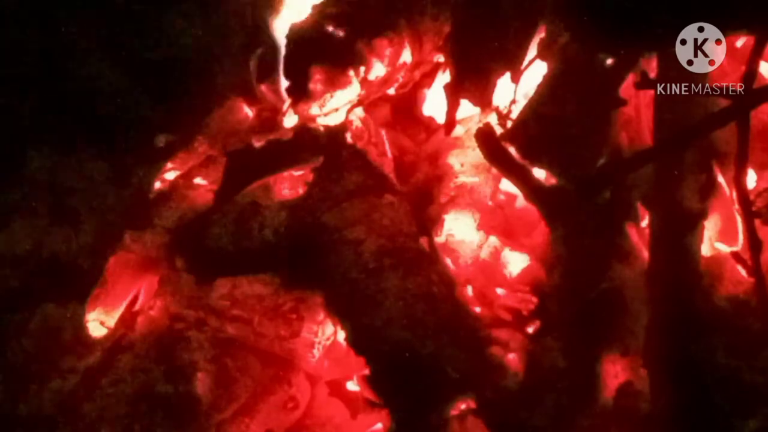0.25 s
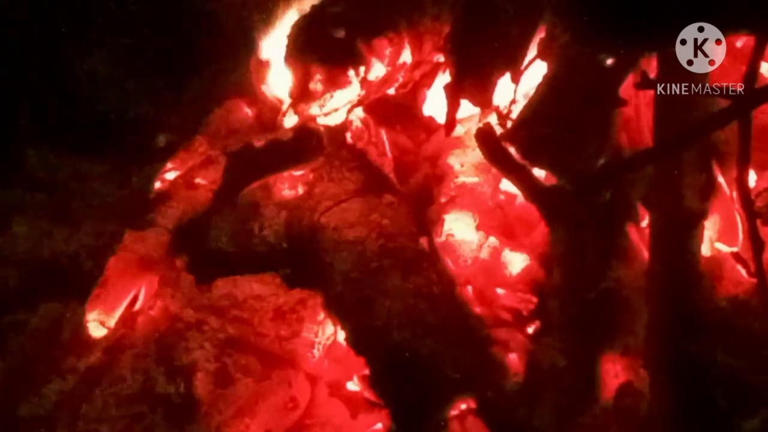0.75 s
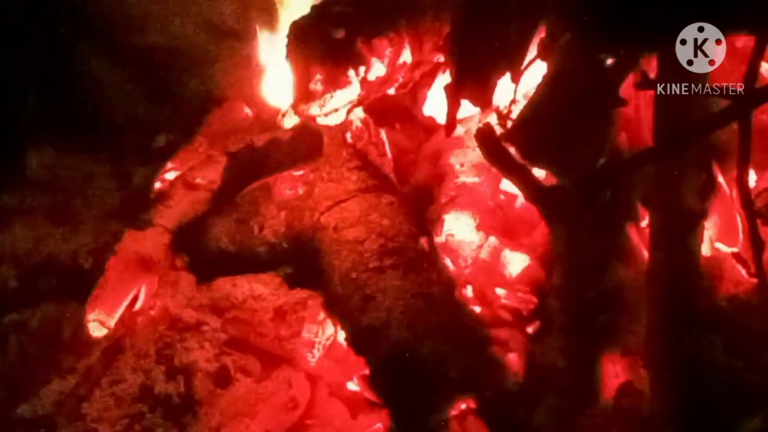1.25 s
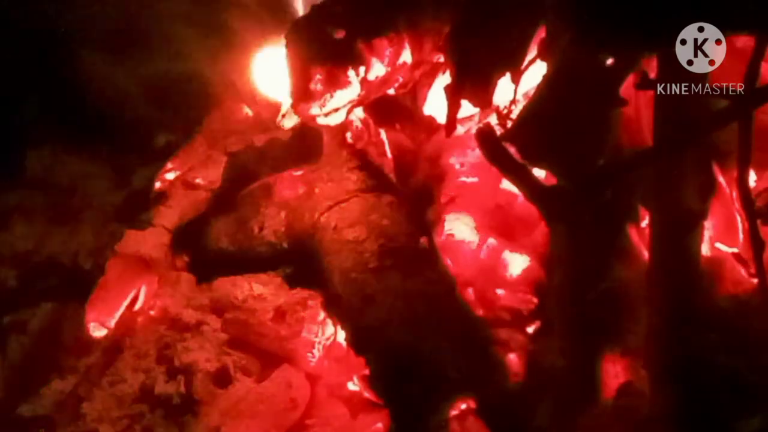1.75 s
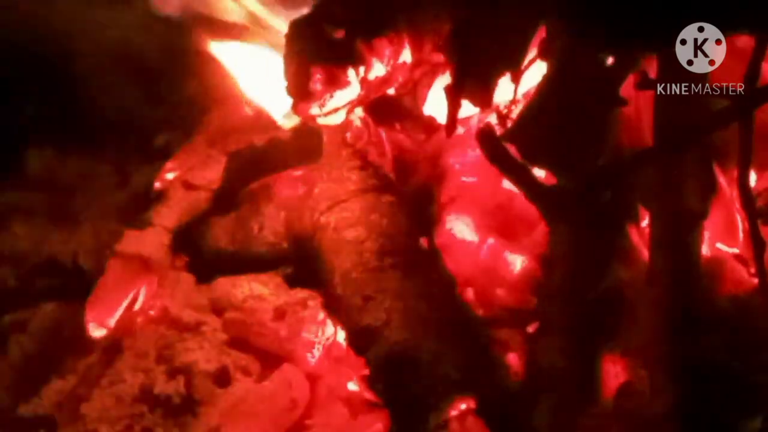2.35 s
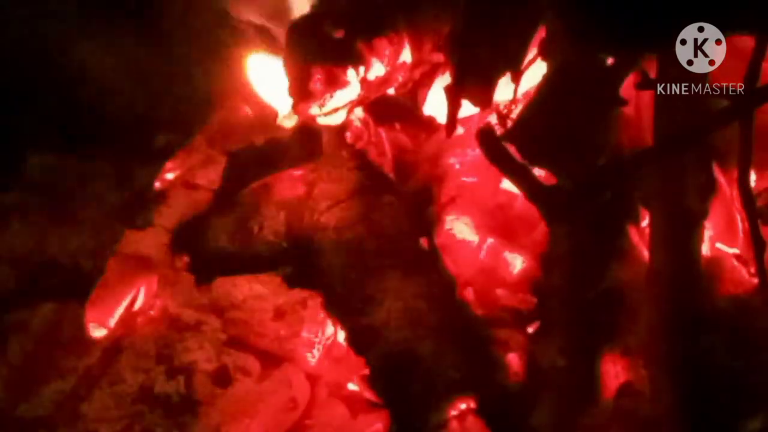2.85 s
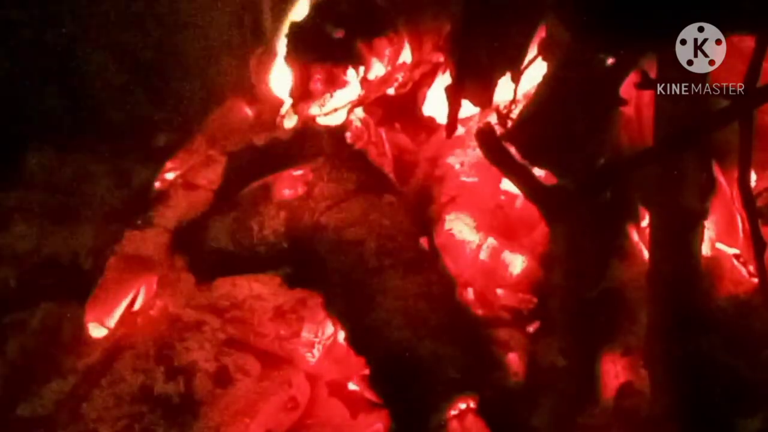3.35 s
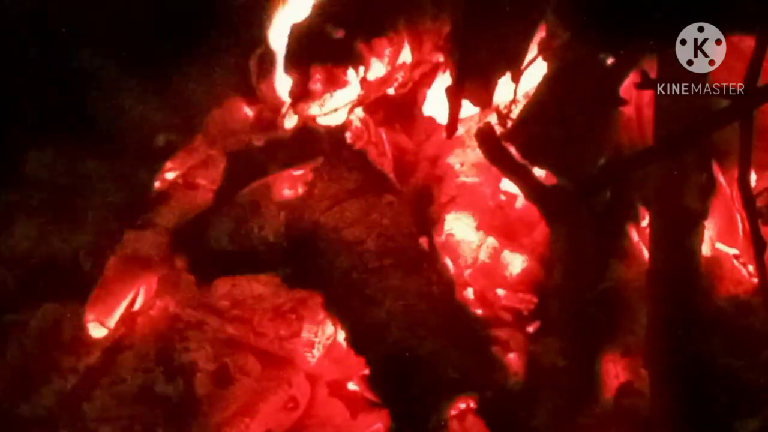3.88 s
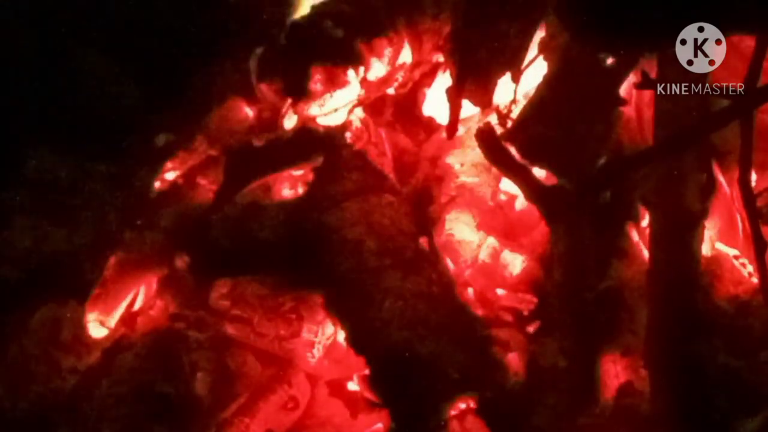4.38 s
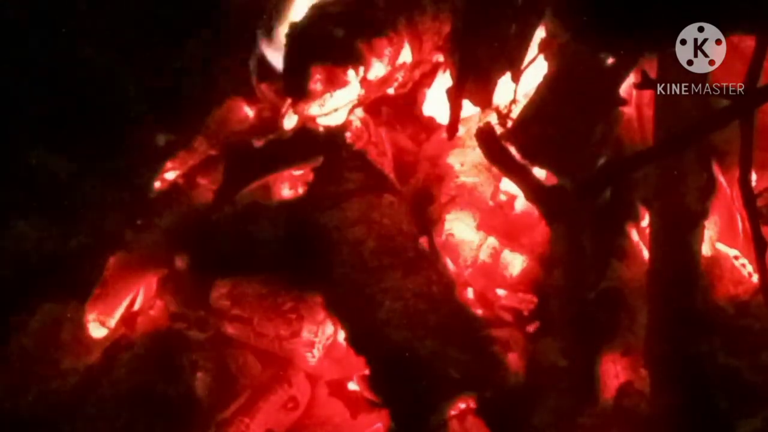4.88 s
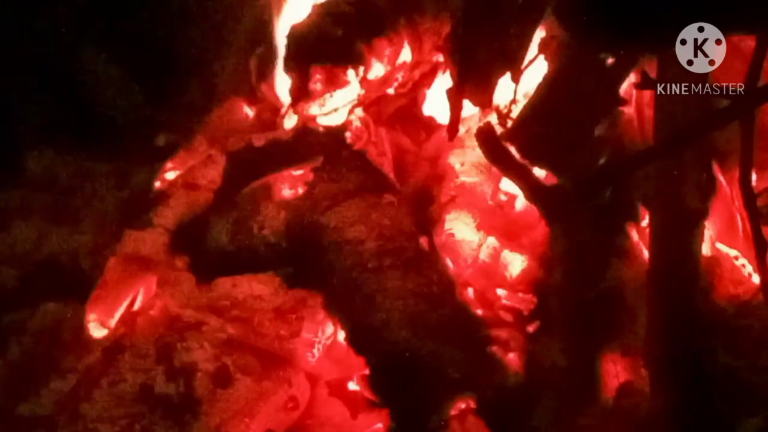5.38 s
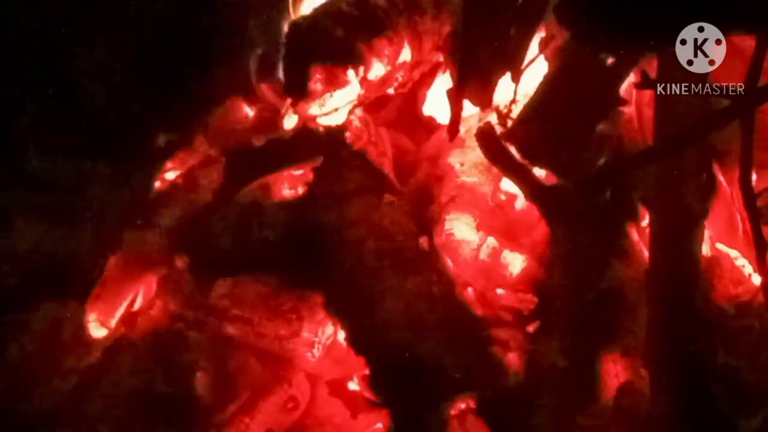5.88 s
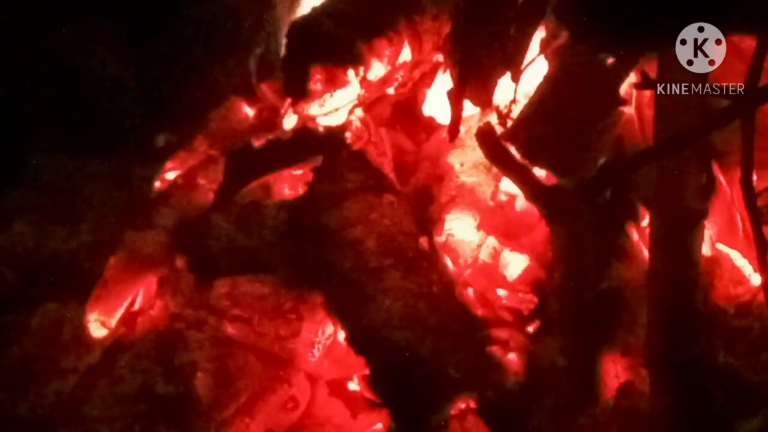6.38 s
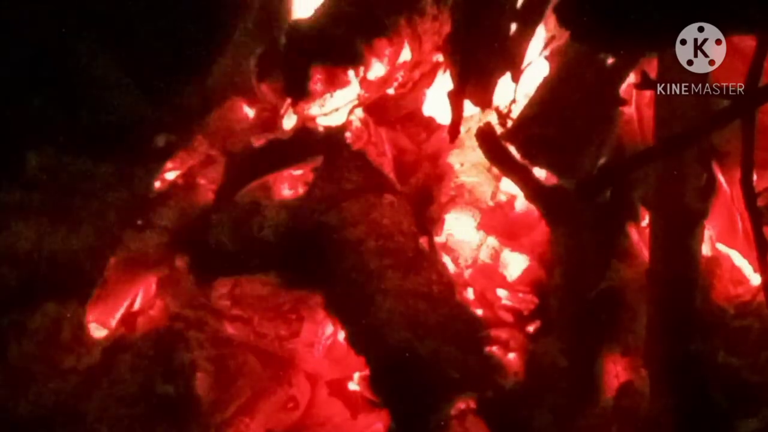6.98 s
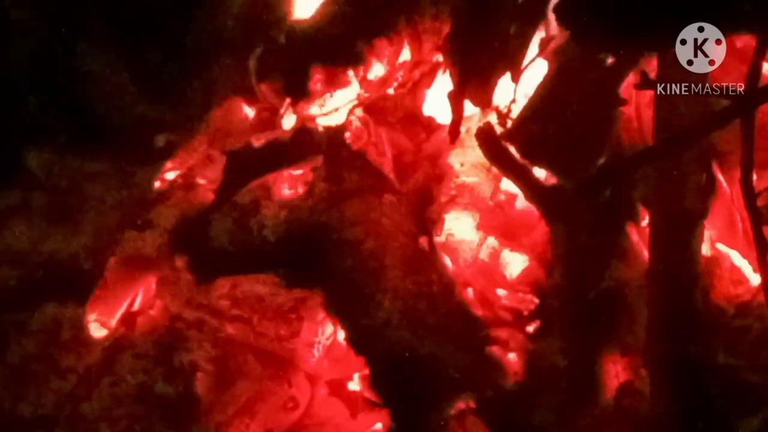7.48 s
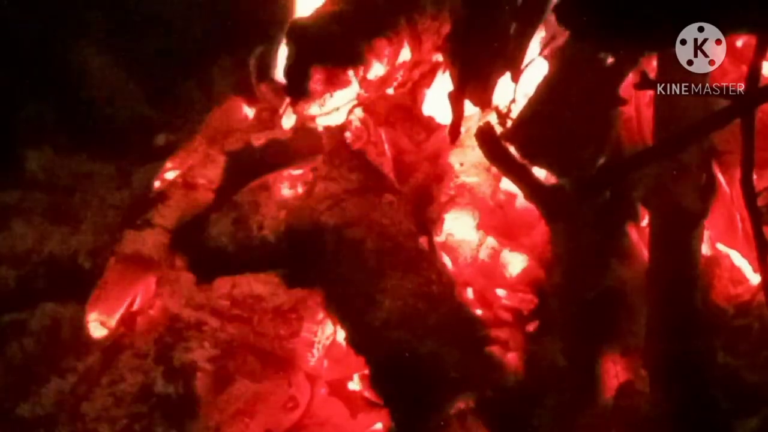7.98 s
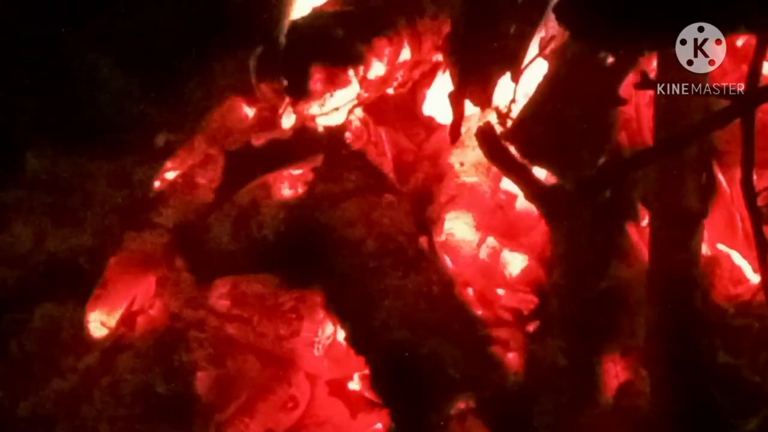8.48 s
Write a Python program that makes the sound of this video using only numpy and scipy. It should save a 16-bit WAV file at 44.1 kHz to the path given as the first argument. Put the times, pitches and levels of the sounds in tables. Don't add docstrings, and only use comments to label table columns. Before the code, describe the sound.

Night insects chirp steadily from surrounding trees, a high thin trill throbbing about three times a second. Beside the microphone, burnt wood crackles irregularly: light ticks and snaps at first, a strong burst past the middle, then one sharp heavy pop and smaller cracks after. Wet wood seeps faint steam, and the low flame flutters quietly in an open outdoor setting.

```python
import sys
import numpy as np
from scipy import signal
from scipy.fft import rfft, irfft, next_fast_len
from scipy.io import wavfile
from scipy.ndimage import uniform_filter1d

SR = 44100
rng = np.random.default_rng(int(sys.argv[2]) if len(sys.argv) > 2 else 0)


def unload_audio(sound):
    columns = np.transpose(np.atleast_2d(sound))
    steps = np.round(np.clip(columns, -1, 1) * 32767)
    wavfile.write(sys.argv[1], SR, steps.astype(np.int16))


N = 385434
TIME = np.arange(N) / SR
LEAD_IN = 64


def undb(db):
    return np.exp(np.asarray(db) * (np.log(10) / 20))


def unit(x):
    return x / np.sqrt(np.mean(x ** 2))


def peak(x, db):
    return x * undb(db) / np.max(np.abs(x))


def ring(x, hz, width_hz):
    return signal.lfilter(*signal.iirpeak(min(hz, .45 * SR), hz / width_hz, fs=SR), x, axis=-1)


def band(x, hz, kind, order=4):
    return signal.sosfilt(signal.butter(order, hz, kind, fs=SR, output="sos"), x)


def walk(rate):
    levels = rng.standard_normal(int(N / SR * rate) + 2)
    t = TIME[::16]
    joined = np.interp(t * rate, np.arange(len(levels)), levels)
    smooth = uniform_filter1d(joined, int(SR / rate / 32))
    return np.interp(TIME, t, 1.2 * smooth)


def hiss(colour, flicker_db, flicker_rate, per_octave=2):
    hz, db = np.transpose(colour)
    size = next_fast_len(N)
    octave = np.log2(np.maximum(np.fft.rfftfreq(size, 1 / SR), 1))
    spectrum = rfft(rng.standard_normal(size)) * undb(np.interp(octave, np.log2(hz), db))
    out = 0
    for centre in np.arange(np.log2(hz[1]), np.log2(hz[-1]), 1 / per_octave):
        share = np.clip(1 - np.abs(octave - centre) * per_octave, 0, 1)
        out = out + irfft(spectrum * share, size)[:N] * undb(flicker_db * walk(flicker_rate))
    return unit(out)


def swells(table):
    t = TIME[::64]
    power = sum(undb(2 * db) * np.exp(-(3.25 * (t - s) / length) ** 2) for s, db, length in table)
    return np.interp(TIME, t, power)


def add(track, s, sound):
    i = int(s * SR)
    track[i:i + len(sound)] += sound[:len(track) - i]


def chirps():
    # (time [s], level [dB], lead over the beat [chirps])
    near = [(0, -50, 0.077), (1.0, -48.5, -.04), (1.55, -52, -.12), (1.9, -52.5, 0.14), (2.4, -50, 0.17),
            (3.4, -55, -0.094), (4.3, -50.5, 0.0088), (4.7, -51.5, -0.12), (5.5, -56.5, 0.17),
            (6.1, -50.5, -0.026), (6.7, -59, 0.09), (7.2, -62, -0.13), (7.9, -53, 0.041),
            (8.74, -55, -0.037)]
    s, near_db, lead = np.transpose(near)
    per_s, slowing_per_s2, start, share = 3.6, .065, .37, .5
    far_chorus_db = -50.5
    beat = (per_s - slowing_per_s2 * TIME / 2) * TIME + start + share / 2
    beat = beat + np.interp(TIME, s, lead)
    level = (beat % 1 < share) * undb(np.interp(TIME, s, near_db))
    syllables = np.sin(2 * np.pi * np.cumsum(28 * (1 + 0.116 * walk(8))) / SR)
    return uniform_filter1d(level, size=2400) * undb(5 * syllables) + undb(far_chorus_db)


def insects():
    # (wing resonance [Hz], strokes [per s], level [dB])
    singers = [(6330, 118, -24), (6440, 127, -7), (6560, 131, 1.5), (6680, 139, 0.5), (6815, 128, -3.5),
               (7000, 147, -13.5)]
    level = chirps()
    out, crowd = 0, 0
    for hz, rate, db in singers:
        phase = np.cumsum(rate * (1 + 0.1 * walk(50))) / SR
        strokes = np.diff(np.floor(phase), prepend=0) * undb(3.54 * walk(70))
        phrase = undb(db + 1.5 * walk(12))
        crowd = crowd + phrase ** 2
        wing = ring(ring(ring(strokes, hz, 120), hz, 190), hz, 280)
        out = out + phrase * unit(wing)
    out = out / np.sqrt(crowd) * level
    t = TIME[:SR // 4]
    trees = unit(rng.standard_normal(len(t)) * undb(-60 * t / .18)) / np.sqrt(len(t))
    return undb(-7.5) * (out + undb(-3.5) * signal.oaconvolve(out, trees)[:N])


def flame():
    # (frequency [Hz], level per Hz [dB])
    flame_colour = [(15, -66), (28, -30), (45, -11.5), (70, 1.5), (120, -1.5), (190, -11), (270, -18.5),
                    (400, -36), (700, -44.5)]
    # (middle [s], level [dB], length [s])
    puff_times = [(0, -60, 0.046), (0.22, -62, .22), (0.42, -56.5, 0.1), (0.78, -62, 0.12),
                  (1.22, -57.5, 0.073), (1.42, -61, 0.064), (2.12, -61.5, 0.089), (2.33, -57, 0.089),
                  (2.6, -67, .1), (3.14, -60.5, 0.09), (3.48, -62, 0.11), (3.72, -63, 0.13),
                  (4.3, -61.5, 0.099), (4.48, -58.5, 0.15), (4.8, -68, 0.31), (4.95, -65, 0.13),
                  (5.1, -61, 0.13), (5.55, -59.5, 0.28), (5.9, -56, 0.3), (6.28, -55, 0.078),
                  (6.43, -60.5, 0.087), (6.9, -70, 0.48), (7.35, -61, .12), (7.56, -58, 0.24),
                  (7.85, -68, 0.089), (8.35, -62, 0.074), (8.7, -74, .1)]
    calm_db = -73.5
    burn = hiss(flame_colour, 1.9, 8)
    flutter = unit(band(burn, 206.0, "low")) * undb(-51.0 + 0.47 * walk(2.605))
    draught = np.sqrt(swells(puff_times) + undb(2 * calm_db))
    puffs = unit(band(burn, 214, "high")) * draught * undb(1.8 * walk(12))
    return flutter + puffs


def woods_hush():
    # (frequency [Hz], level per Hz [dB])
    hush_colour = [(180, -38), (300, -1), (440, -9.5), (790, -10), (1800, -19), (3000, -28), (5000, -25.5),
                   (7000, -42)]
    return undb(-72.5 + 1.1 * walk(11)) * hiss(hush_colour, 3, 18, per_octave=4.98)


def steam_level():
    # (time [s], level [dB])
    seep = [(0, -62), (0.8, -64), (1.25, -55.5), (1.5, -64), (2.4, -62), (2.97, -69.5), (3.03, -58.5),
            (3.4, -59.5), (3.82, -62), (4.3, -60), (4.85, -65), (5.5, -61), (5.8, -57.5), (6.2, -62),
            (6.55, -62.5), (7.3, -62.5), (7.8, -64), (8.74, -65)]
    # (middle [s], level [dB], length [s])
    spurts = [(0.06, -60, .14), (0.56, -57.5, 0.092), (0.93, -52.5, 0.1), (1.1, -71, 0.2),
              (1.33, -70, 0.13), (2.06, -61.5, 0.2), (2.28, -57.5, 0.099), (3.15, -64, 0.18),
              (3.3, -55.5, 0.18), (3.6, -63, 0.3), (3.91, -56.5, 0.047), (4.25, -57, 0.38),
              (4.52, -57, 0.077), (4.74, -58.5, 0.22), (4.96, -72, 0.17), (5.06, -57, 0.15),
              (5.22, -48.5, 0.18), (5.65, -63, 0.16), (5.9, -56.5, .12), (6.1, -56, 0.11),
              (6.27, -51, 0.084), (6.75, -55, 0.16), (7, -68, 0.23), (7.51, -58, 0.26),
              (7.84, -63.5, 0.067), (8.08, -55, 0.15), (8.67, -61.5, 0.13)]
    return np.sqrt(undb(2 * np.interp(TIME, *np.transpose(seep))) + swells(spurts))


def bubbles():
    # (ring [Hz], width [Hz], ticks [per s], level re steam [dB])
    bubble_kinds = [(2630, 340, 20, 14), (4490, 640, 40, 18.5), (9000, 3300, 37, 21), (13000, 4600, 35, 17)]
    out = 0
    for hz, width_hz, rate, db in bubble_kinds:
        chance, ticks = rng.random((int(rate * N / SR), 2)), np.zeros(N)
        extra_db = 5.5 * np.minimum(-np.log(1 - chance[:, 1]), 2.2)
        ticks[(chance[:, 0] * N).astype(int)] = undb(db + extra_db)
        out = out + ring(ring(ticks, hz, width_hz), hz, 1.3 * width_hz)
    return out


def burst(chance, rise_s, fall_s):
    t = (np.arange(chance.shape[-1]) - LEAD_IN) / SR
    return chance * np.exp(np.where(t < 0, t / rise_s, -t / fall_s)) + 1.36 * (t == 0)


def pops(table, shape):
    snaps, jets = np.zeros(N), np.zeros(N)
    t = TIME[:int(.4 * SR)]
    for (s, db, hz, gas_db, t60), chance in zip(table, rng.standard_normal((len(table), 384))):
        add(snaps, s - LEAD_IN / SR, peak(shape(chance, hz, db), db))
        fade = undb(-120 * t / max(t60, .01)) + 0.095 * undb(-45 * t / max(t60, .01))
        add(jets, s, undb(2 * (db + gas_db)) * fade * (1 - np.exp(-t / 0.00046)))
    return snaps, jets


def crack(chance, hz, db):
    tear = burst(chance, .0001, 0.00012 * undb(0.93 * (db + 30)))
    return band(ring(tear + 3.0 * ring(tear, hz, 1200), 10000, 7900), 5980, "high", order=8)


def dry_snaps():
    # (time [s], peak [dB], ring [Hz])
    snap_times = [(0.184, -29, 13800), (0.8259, -33, 10500), (0.9468, -34.5, 10200), (1.1073, -36, 8700),
                  (1.8395, -39, 12600), (2.0076, -33, 11300), (2.3256, -36, 10300), (2.464, -31, 10900),
                  (3.0224, -34, 9200), (3.2434, -29, 9100), (3.477, -29, 14200), (3.479, -26.5, 11600),
                  (3.5083, -31.5, 13100), (4.1145, -23, 13800), (4.1422, -38, 11700), (4.9948, -30.5, 9000),
                  (5.1242, -15, 12100), (5.357, -22.5, 13000), (5.8786, -32, 8900), (6.052, -35, 11300),
                  (6.0965, -32, 8900), (6.266, -27, 11700), (6.5327, -36, 10900), (6.5761, -12, 8900),
                  (6.922, -32, 10600), (1.695, -37, 9000), (7.4806, -23.5, 13800), (7.977, -31, 8800),
                  (8.0259, -33.5, 9400), (8.36, -33.5, 9900)]
    gas_db, gas_t60_s = -24, 0.067
    return pops([(*row, gas_db, gas_t60_s) for row in snap_times], crack)


def knock(chance, hz, db):
    return ring(ring(burst(chance, 0.00031, 0.00054), hz, 0.35 * hz), hz, 0.47 * hz)


def charcoal_knocks():
    # (time [s], peak [dB], ring [Hz], vented gas re peak [dB])
    knock_times = [(1.6493, -35, 4800, -24), (2.3247, -46, 4800, -12.5), (2.522, -38, 4970, -18),
                   (3.009, -46, 5300, -9.5), (3.0766, -48, 4200, -12), (3.2753, -40, 5100, -13.5),
                   (3.3215, -41.5, 3700, -19), (3.4792, -35.5, 4670, -25), (3.9737, -50.5, 3100, -7),
                   (4.064, -33.5, 5270, -21), (4.863, -29, 5900, -26.5), (4.9945, -32.5, 4460, -27),
                   (5.077, -19, 4900, -24.5), (3.3972, -46.5, 4900, -20), (5.118, -14, 5500, -23.5),
                   (5.1773, -25.5, 4660, -17.5), (5.1839, -33, 4560, -31), (5.5443, -31.5, 5100, -21.5),
                   (5.8378, -40, 4930, -11), (5.992, -50.5, 5500, -4), (6.2888, -39, 2780, -17),
                   (6.3103, -43.5, 2860, -12.5), (6.4207, -39.5, 5100, -15.5), (6.5692, -19.5, 2780, -13),
                   (6.693, -41, 4970, -15), (6.872, -46, 4260, -12.5), (7.2742, -37.5, 5120, -26),
                   (7.3724, -38, 5270, -13), (7.4631, -36.5, 5540, -23), (7.4815, -32, 5730, -20)]
    # (time [s], peak [dB], ring [Hz], width [Hz])
    hollows = [(1.6502, -44, 3600, 1200), (4.21, -57, 2200, 300), (5.0768, -27, 2900, 1800),
               (5.119, -28, 2000, 1600), (5.76, -60, 2000, 250), (6.011, -47, 2480, 500),
               (6.2654, -45, 2700, 900), (6.1, -52, 3500, 500), (6.4225, -48, 2640, 500),
               (6.5689, -20, 5700, 900), (6.5691, -25, 2200, 1300), (6.5695, -35, 1350, 300),
               (7.374, -49, 1810, 250)]
    knocks, jets = pops([(*row, .13) for row in knock_times], knock)
    chances = rng.standard_normal((len(hollows), 1024))
    for (s, db, hz, width_hz), chance in zip(hollows, chances):
        hollow = ring(ring(burst(chance, .0002, .0006), hz, width_hz), hz, 1.6 * width_hz)
        add(knocks, s - LEAD_IN / SR, peak(hollow, db))
    return band(knocks, 1370, "high"), jets


def gas_cracks():
    # (time [s], peak [dB], ring [Hz], vented gas re peak [dB], gas t60 [s])
    crack_times = [(1.6498, -32.5, 8700, -25, .12), (1.7101, -25, 9500, -23, .048),
                   (2.2697, -38, 9900, -19, 0.53), (2.5228, -33, 9100, -20.5, .31),
                   (2.817, -29.5, 9300, -27, .092), (3.0091, -36, 9200, -10.5, 0.086),
                   (3.0762, -29.5, 9700, -21, 0.14), (3.275, -31, 8400, -13, 0.11),
                   (3.3207, -26.5, 9200, -25, .09), (4.0642, -27, 8500, -20, 0.16),
                   (4.6018, -34, 13000, -18, 0.21), (4.863, -18, 11600, -15.5, 0.24),
                   (5.0764, -16.5, 11300, -17, 0.13), (5.1176, -18, 11000, -12, 0.27),
                   (5.1832, -19, 12500, -20, .13), (5.5444, -22.5, 13500, -20, .09),
                   (5.8392, -32, 11300, -18, 0.11), (5.9931, -25, 11200, -13.5, 0.077),
                   (6.4221, -29.5, 11000, -18, 0.16), (6.569, -9.5, 9800, -20, 0.37),
                   (7.2725, -27.5, 12400, -21, 0.21), (7.3732, -24.5, 8400, -17.5, 0.16),
                   (7.4634, -33.5, 12800, -10, 0.28), (7.6464, -28.5, 9300, -17.5, .18)]
    echo_s, echo_db = 0.01, -10.5
    cracks, jets = pops(crack_times, crack)
    add(cracks, echo_s, undb(echo_db) * cracks)
    return cracks, jets


def embers():
    # (frequency [Hz], level per Hz [dB])
    gas_colour = [(3000, -15), (5000, -10), (6400, -4.5), (7490, -11.5), (8300, 1.5), (9700, -1),
                  (12500, -2.5), (14000, -3.5), (15800, -5.5), (17000, -23)]
    # (frequency [Hz], level per Hz [dB])
    wood_colour = [(590, -49), (1000, -27), (1060, -28), (1350, -19), (2480, -13), (3060, -11),
                   (3630, -9.5), (6000, -1.5), (7800, -34), (13200, -120)]
    dull_db, dull_per_db, dull_pivot_db = -66, 1.5, -57
    steam = steam_level()
    ticks = steam * bubbles()
    snaps, snap_jets = dry_snaps()
    knocks, knock_jets = charcoal_knocks()
    cracks, crack_jets = gas_cracks()
    body = undb(dull_db) * (steam / undb(dull_pivot_db)) ** dull_per_db
    bright = np.sqrt(crack_jets + snap_jets + steam ** 2) * undb(1.28 * walk(150))
    bright = bright * hiss(gas_colour, 1.06, 14, per_octave=3.95)
    dull = np.sqrt(knock_jets + body ** 2) * undb(2.36 * walk(70))
    dull = dull * hiss(wood_colour, 3.1, 18, per_octave=4.95)
    return cracks + snaps + knocks, bright + dull + ticks


def scene():
    snaps, steam = embers()
    hiss_edge = signal.ellip(10, .2, 70, 15620, fs=SR, output="sos")
    spared = undb(-25) * snaps
    fire = signal.sosfiltfilt(hiss_edge, steam + snaps - spared) + spared
    return (fire + insects() + flame() + woods_hush())[None]


def low_pass(x):
    return signal.sosfilt(signal.butter(12, 16650, fs=SR, output="sos"), x)


def record(dry):
    edge = signal.ellip(10, .2, 70, 16600, fs=SR, output="sos")
    mix = signal.sosfiltfilt(edge, dry)
    return low_pass(mix)


dry = scene()
out = record(dry)
unload_audio(out)
```